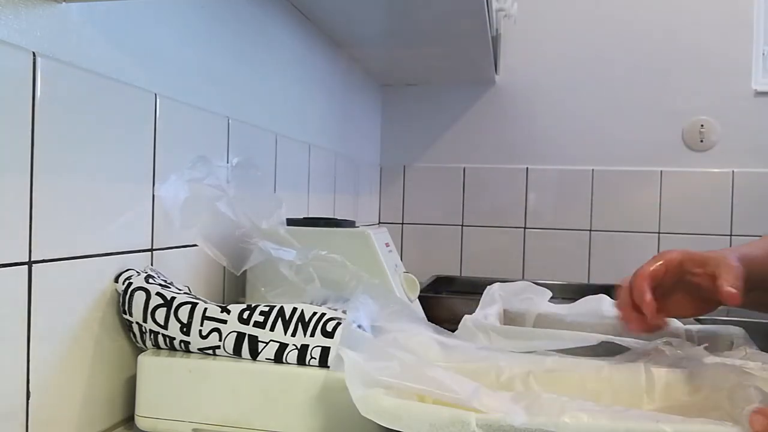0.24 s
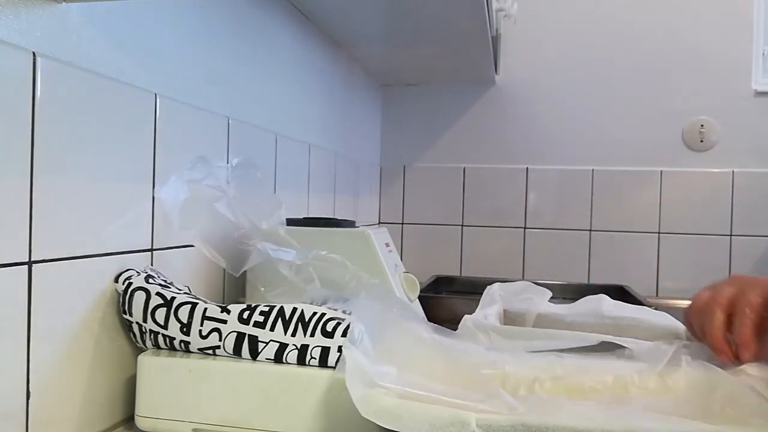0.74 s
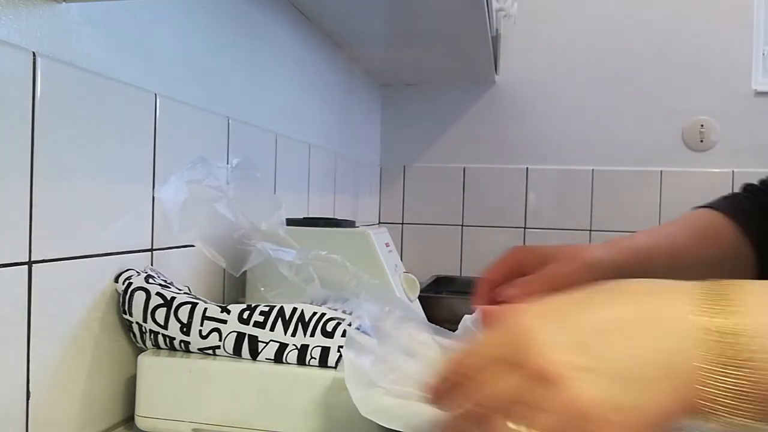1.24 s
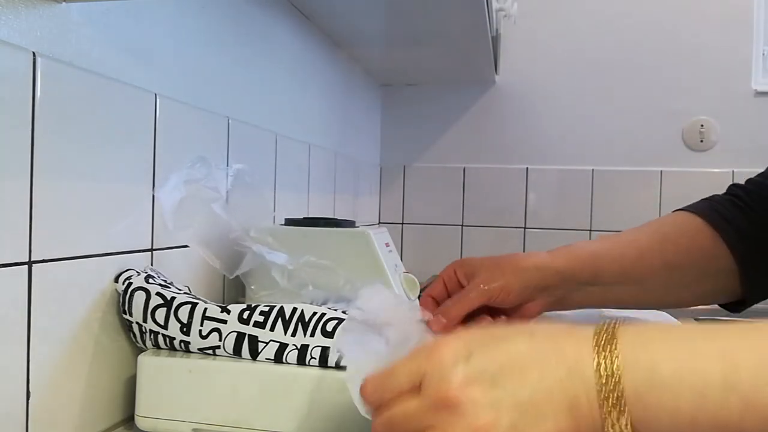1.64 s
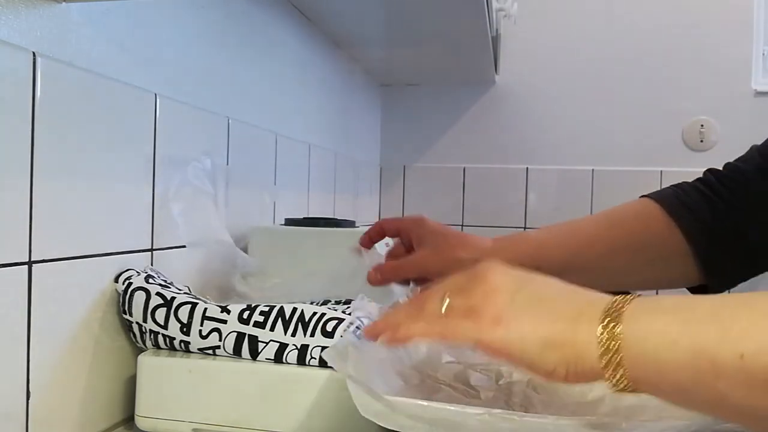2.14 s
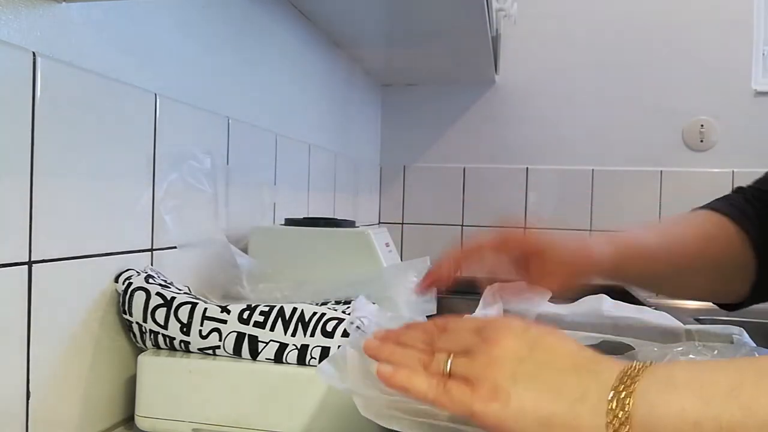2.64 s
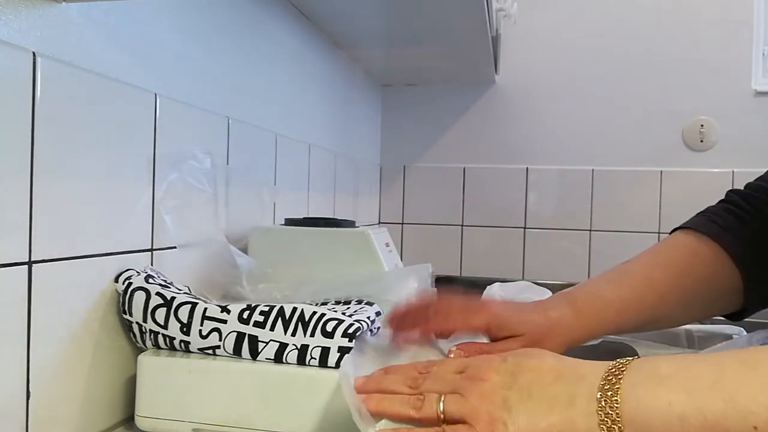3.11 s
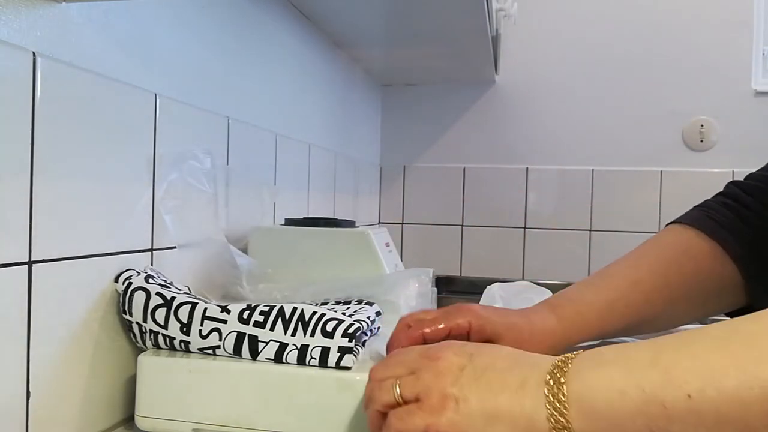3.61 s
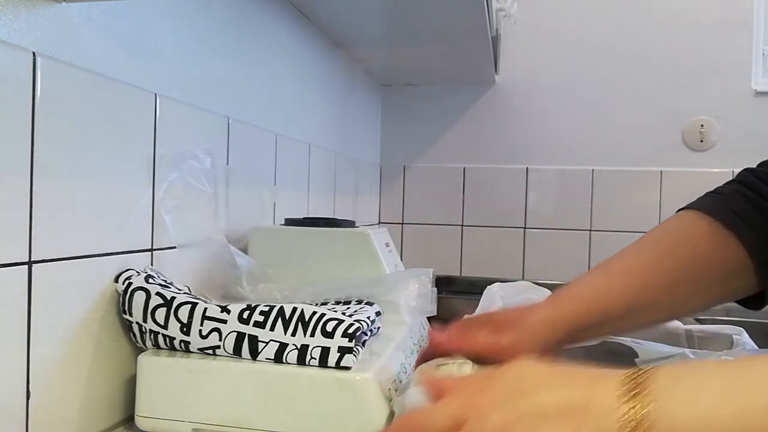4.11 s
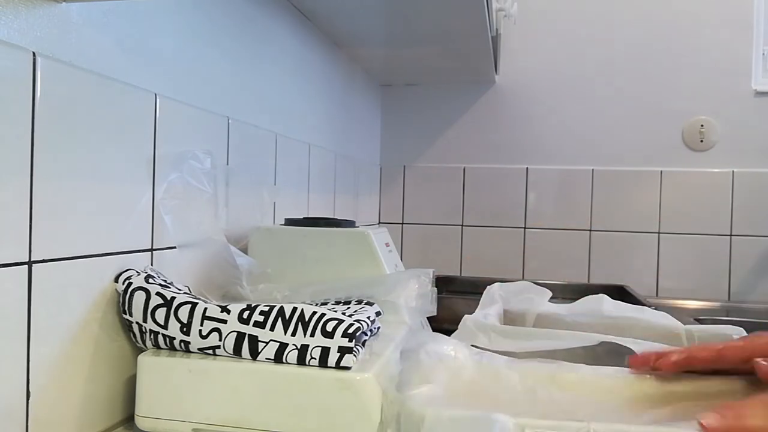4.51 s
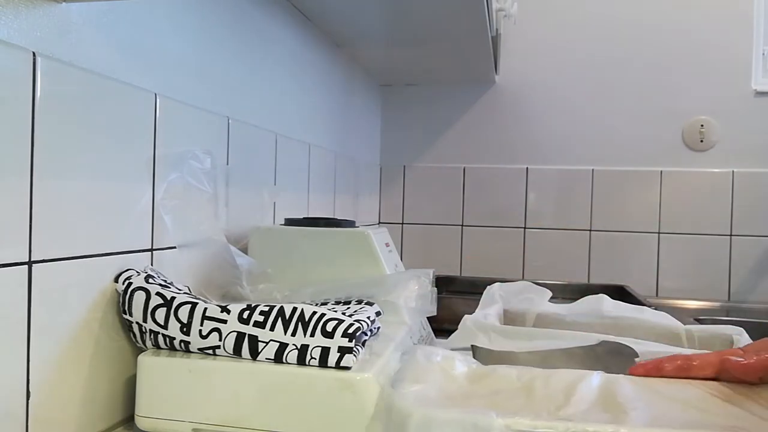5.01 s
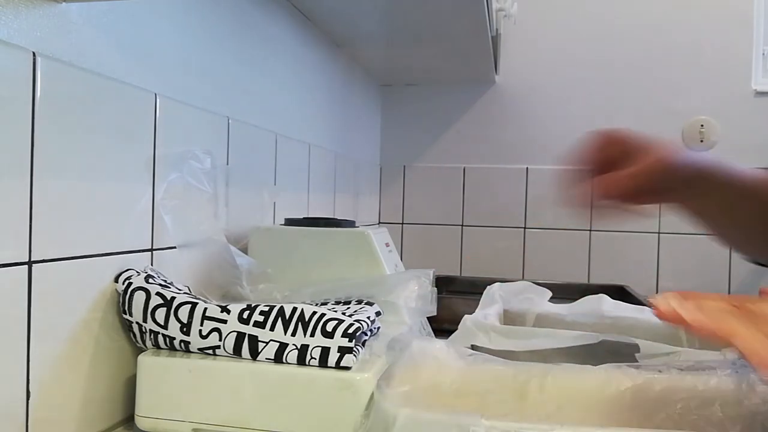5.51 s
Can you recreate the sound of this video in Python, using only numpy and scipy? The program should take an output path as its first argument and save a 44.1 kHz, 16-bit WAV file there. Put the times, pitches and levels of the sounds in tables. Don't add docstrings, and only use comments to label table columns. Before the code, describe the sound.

A thin plastic sheet is folded and tucked over baking tins, close to a stereo microphone in a small, hard tiled kitchen. A tiny crinkle opens the scene, then light rustling from 0.4 s grows to papery snaps and airy pops around 0.75-0.9 s. It nearly stops from 1.0 to 1.3 s, leaving a faint low motor hum and quiet air. A sharp crackle at 1.4 s starts moderate rustling until about 2.25 s, with soft low palm thumps on hollow tin. After a short lull, dense crackling returns at 2.75 s and peaks from 3.4 to 3.85 s in hard, bright snaps and lower fold pops. It continues to 4.2 s, drops, then bursts strongly at 4.45-4.75 s. Smaller clusters follow at 4.9-5.35 s, then quiet, small metallic ticks near 5.55-5.6 s, and a brief final crackle with a soft thump at 5.72 s.

```python
import sys
import numpy as np
from scipy import signal
from scipy.fft import rfft, irfft, next_fast_len
from scipy.io import wavfile
from scipy.ndimage import uniform_filter1d

SR = 44100
rng = np.random.default_rng(int(sys.argv[2]) if len(sys.argv) > 2 else 0)


def amplitude_ratio(level_db):
    exponent = np.asarray(level_db, float) / 20
    return 10 ** exponent


def to_wav(s):
    ch = np.atleast_2d(s).T
    pcm = np.round(np.clip(ch, -1, 1) * 32767)
    wavfile.write(sys.argv[1], SR, pcm.astype(np.int16))


N = 253575


def rms_one(x):
    return x / np.sqrt(np.mean(x ** 2) + 1e-20)


def in_time(rows):
    s, *columns = np.transpose(rows)
    return [np.interp(np.arange(N) / SR, s, column) for column in columns]


def at_hz(points, hz):
    table_hz, value = np.array(points).T
    return np.interp(np.log(np.maximum(hz, 1)), np.log(table_hz), value)


def drift(rate):
    r = np.exp(-80 * np.pi * rate / SR)
    slow = signal.lfilter([1], [1, -2 * r, r * r], rng.standard_normal(N // 40 + 2002))[2000:]
    return np.interp(np.arange(N) / 40, np.arange(len(slow)), rms_one(slow))


def ring(clicks, hz, t60):
    r = amplitude_ratio(-60 / (t60 * SR))
    w = 2 * np.pi * min(hz, .45 * SR) / SR
    return signal.lfilter([np.sin(w)], [1, -2 * r * np.cos(w), r * r], clicks + 1e-18)


def coloured(x, points, share=1):
    size = next_fast_len(x.shape[-1])
    gain = amplitude_ratio(share * at_hz(points, np.fft.rfftfreq(size, 1 / SR)))
    return irfft(rfft(x, size) * gain, size)[..., :x.shape[-1]]


# frequency in Hz, correlation from 0 to 1.
FIELD_LIKENESS = [(30, .985), (100, 0.86), (170, 0.35), (300, 0.071), (600, 0.2), (1200, 0.34),
                  (3000, 0.031)]


def pair(shape):
    mid, side = rfft(rng.standard_normal((2, shape)))
    alike = np.clip(at_hz(FIELD_LIKENESS, np.fft.rfftfreq(shape, 1 / SR)), 0, 1)
    both = np.sqrt(1 + alike) * mid + np.sqrt(1 - alike) * side * [[1], [-1]]
    return irfft(both, shape) / np.sqrt(2)


# frequency in Hz, level in dB per Hz.
AIR_SPECTRUM = [(180, -31), (300, -6.5), (343, -13.5), (450, -16), (994, -16.5), (3700, -21.5), (4370, -26),
                (13300, -37), (16000, -47)]
# frequency in Hz, level in dB per Hz.
RUMBLE_SPECTRUM = [(15, 5), (40, -1), (90, 2.5), (190, -9), (350, -8.5), (600, -38)]


def still_air():
    out = 0
    for spectrum, level_db in ((AIR_SPECTRUM, -75.5), (RUMBLE_SPECTRUM, -76.5)):
        noise = pair(N + N % 2)[:, :N]
        out = out + amplitude_ratio(level_db) * rms_one(coloured(noise, spectrum))
    return out


# time in seconds, level in dB.
DRONE_LEVEL = [(0.0, -79.5), (0.89, -66.5), (1.68, -64), (2.03, -80.5), (2.32, -67.5), (2.37, -77),
               (2.69, -72.5), (2.77, -64), (2.9, -70), (3.27, -76), (3.43, -57.5), (3.73, -85), (3.88, -64),
               (3.96, -84), (4.37, -70), (4.42, -75.5), (5.61, -76), (5.75, -72)]
# frequency in Hz, bandwidth in Hz, level in dB.
ROOM_MODES = [
    (111, 6, -7),
    (137, 14, -3),
    (245, 30, -14),
]


def drone():
    out = 0
    for hz, width_hz, level_db in ROOM_MODES:
        t60 = np.log(1000) / np.pi / width_hz
        out = out + amplitude_ratio(level_db) * rms_one(ring(rng.standard_normal(N), hz, t60))
    near_s, hum_db, hum_hz, wander_hz = 1.3, 14.5, 110.6, 0.13
    near = np.exp(-((np.arange(N) / SR - near_s) / 0.57) ** 4)
    turns = np.cumsum(hum_hz + wander_hz * drift(1.73)) / SR
    out = out + amplitude_ratio(hum_db - 17 * (1.5 - near)) * np.sin(2 * np.pi * turns)
    steady = out / np.sqrt(uniform_filter1d(out ** 2, size=9000))
    return amplitude_ratio(in_time(DRONE_LEVEL)[0]) * steady


# start in seconds, peak in dB, frequency in Hz, t60 in seconds.
PALM_TUCKS = [(1.462, -61, 239, 0.19), (1.789, -58, 243, 0.14), (1.96, -55.5, 274, 0.089),
              (2.011, -61, 290, 0.21), (2.06, -58.5, 245, 0.17), (2.112, -58.5, 286, 0.092),
              (2.2, -58.5, 330, 0.11), (4.529, -54, 243, 0.19), (5.302, -54.5, 310, 0.1),
              (2.776, -56, 122, 0.097), (3.392, -43.5, 247, 0.15), (3.459, -59, 107, 0.1),
              (3.828, -55, 418, 0.12), (5.723, -53.5, 425, 0.17), (2.868, -53, 438, .1),
              (3.226, -54, 452, .1), (3.7, -55, 251, 0.12), (4.05, -55, 440, .1), (5.172, -53, 450, .1),
              (.45, -61, 436, .12), (.83, -60, 252, .14)]


def tucks():
    out = np.zeros(N)
    for s, peak_db, hz, t60 in PALM_TUCKS:
        push, i = np.zeros(N), round(s * SR)
        push[i:i + 60] = np.hanning(60) / 30
        out += amplitude_ratio(peak_db) * ring(push, hz, t60)
    return out


# start in seconds, peak in dB, frequency in Hz, t60 in seconds.
AIR_POCKETS = [(0.757, -46.5, 787, 0.15), (0.799, -43, 712, 0.063), (0.857, -48.5, 1054, 0.048),
               (0.898, -47, 950, 0.05), (1.425, -45, 1090, 0.019), (1.702, -42, 1180, 0.038),
               (1.716, -48, 1280, 0.028), (1.782, -43, 1195, 0.04), (3.141, -39.5, 1330, 0.022),
               (3.166, -33.5, 1237, 0.03), (4.047, -43.5, 994, 0.074), (4.198, -46, 1000, 0.031),
               (4.253, -51.5, 1100, 0.044), (3.113, -39.5, 1164, 0.031), (3.499, -38, 1120, 0.013),
               (3.558, -41, 1150, 0.014), (4.425, -65, 1000, 0.061), (4.454, -39, 3050, 0.067)]


def flaps():
    push_s = 0.0014
    out = np.zeros(N)
    pushes = rng.standard_normal(size=(30, 400)) * np.exp(-np.arange(400) / SR / push_s)
    for (s, peak_db, hz, t60), push in zip(AIR_POCKETS, pushes):
        high = signal.butter(2, hz / 2, "high", fs=SR, output="sos")
        tone = signal.sosfilt(high, ring(np.pad(push, (0, 4000)), hz, t60))
        i = round(s * SR)
        out[i:i + 4400] += amplitude_ratio(peak_db) * tone / np.abs(tone).max()
    return out


# start in seconds, hold in seconds, crinkle in dB, slack in dB.
EARLY_STROKES = [(0.0, 0.0045, -50.5, -1), (0.066, 0.01, -60, 9), (0.164, 0.11, -71, 4),
                 (0.33, 0.056, -66, -8), (0.364, .02, -59.5, -14), (0.405, 0.25, -51, -13.5),
                 (0.62, 0.065, -46.5, -6), (0.723, 0.028, -47.5, -1), (0.758, 0.027, -41, -17.5),
                 (0.769, 0.13, -50, -7), (1.308, 0.007, -74, 5), (1.363, 0.011, -66, 15),
                 (1.391, 0.018, -53, 9), (1.416, 0.019, -44.5, 0), (1.456, 0.059, -47, 1),
                 (1.551, 0.042, -46.5, -9), (1.635, 0.11, -56.5, -14), (1.688, 0.063, -52, -4),
                 (1.768, 0.021, -47, 1), (1.841, 0.16, -52.5, 1), (1.93, 0.32, -51, -11.5),
                 (2.194, 0.028, -45.5, -11), (2.28, 0.1, -59, -3.5), (2.464, 0.088, -70, -4),
                 (2.74, 0.1, -46.5, -4), (2.87, 0.058, -40.5, -1)]
# start in seconds, hold in seconds, crinkle in dB, slack
# in dB.
LATER_STROKES = [(2.91, 0.093, -50, -1), (3.037, 0.043, -45, -1), (3.108, 0.037, -42.5, -7),
                 (3.184, 0.028, -59, 0), (3.217, 0.0041, -53, 13), (3.332, 0.052, -50, 0),
                 (3.385, 0.015, -37, 15), (3.394, 0.051, -35, -12.5), (3.502, 0.3, -39.5, -7.5),
                 (3.761, 0.021, -34.5, -15), (3.838, 0.052, -48, 7), (3.91, 0.12, -43, -22),
                 (4.036, 0.0097, -35.5, -12), (4.078, 0.024, -47, 12), (4.161, 0.0047, -42, -7),
                 (4.197, 0.031, -59, 19), (4.385, .005, -53, -45), (4.426, 0.027, -46.5, -22),
                 (4.462, 0.1, -43, -4), (4.599, 0.11, -41, -17), (4.75, 0.11, -49.5, -29),
                 (4.914, 0.082, -48.5, -15), (5.024, 0.067, -57, -3), (5.109, 0.031, -39, -13),
                 (5.169, 0.0099, -41, 1), (5.197, 0.021, -39.5, -9), (5.256, 0.057, -51, 4),
                 (5.557, 0.015, -58, -27), (5.622, .005, -67, -26), (5.708, .016, -59, -15),
                 (5.723, .04, -40, -33)]


def handling():
    grip_db_per_s, settle_db_per_s, crease_settle_db_per_s = 1496, 267, 129
    t = np.arange(0, N + 32, 32) / SR
    s, hold_s, level_db, slack_db = np.transpose(EARLY_STROKES + LATER_STROKES)[..., None]
    settling_s = np.maximum(t - s - hold_s, 0)
    pull_db = level_db - grip_db_per_s * np.maximum(s - t, 0) - settle_db_per_s * settling_s
    power = amplitude_ratio(pull_db) ** 2 + 1e-14
    crinkle_db, share = 10 * np.log10(power.sum(0)), power / power.sum(0)
    fold_db = (share * slack_db).sum(0)
    settling_s = (share * np.minimum(settling_s, .2)).sum(0)
    crease_db = -15.5 - 0.71 * fold_db - 0.26 * (crinkle_db + 49.5) - crease_settle_db_per_s * settling_s
    return in_time(np.transpose([t, crinkle_db, fold_db, crease_db]))


# frequency in Hz, level in dB per Hz.
SHEET_SPECTRUM = [(180, -50), (300, -33), (511, -16), (565, -51), (645, 0.5), (1040, 9), (2250, 3.5),
                  (3080, 14), (3350, 12.5), (4910, 5.5), (15200, 3), (16000, -34)]
CREASE_ZONES_HZ = [800, 1500, 3200, 10000]


def crinkle(per_s, spread_db, clump_db, cycles, wide):
    crinkle_db, fold_db, crease_db = handling()
    sizes = amplitude_ratio(spread_db * np.minimum(rng.exponential(1, N), 4.0)) * rng.choice([-1, 1], N)
    chance = per_s * amplitude_ratio(clump_db * np.clip(drift(80.0), -1.5, 1.8)) / SR
    snaps = sizes * (rng.random(N) < chance)
    snaps = snaps / np.sqrt(uniform_filter1d(snaps ** 2, size=2600) + .02)
    pitches, dealt = np.geomspace(330, 16000, num=36), rng.integers(0, 36, N)
    whole = rng.random(N) < wide
    fold_share = list(zip(CREASE_ZONES_HZ, [0.5, 0.23, 0.12, 0.34]))
    crease_share = list(zip(CREASE_ZONES_HZ, [0.018, 0.011, 0.0023, 0.47]))
    out = 0
    for k, hz in enumerate(pitches):
        struck = snaps * ((dealt == k) + 0.49 * whole * (-1) ** k)
        patch = rms_one(np.diff(ring(struck, hz, cycles / hz), prepend=0))
        level_db = at_hz(SHEET_SPECTRUM, hz) + at_hz(fold_share, hz) * (fold_db + 12.5)
        level_db = level_db + at_hz(crease_share, hz) * (crease_db + 0.5)
        out = out + amplitude_ratio(level_db) * np.sqrt(hz) * patch
    return amplitude_ratio(crinkle_db - 53) * out


# start in seconds, peak in dB, pitch in Hz.
TIGHT_CREASES = [(.603, -31, 3420), (2.044, -31, 3330), (2.143, -35, 2280), (2.197, -36, 3530),
                 (2.974, -17.5, 3600), (3.51, -21.5, 4900), (3.648, -18.5, 2900), (3.73, -13, 2880),
                 (3.761, -16.5, 3380), (3.776, -12.5, 3270), (4.472, -20, 3200), (4.558, -21.5, 3730),
                 (4.582, -12.5, 4470), (4.597, -19.5, 4870), (4.664, -17, 4180), (4.684, -21, 4720),
                 (4.71, -18, 3200), (4.729, -17, 3160), (4.909, -30, 2860), (5.173, -24, 3000),
                 (5.208, -16.5, 4570), (3.665, -30, 3500), (3.715, -23, 3300), (3.793, -19, 3700),
                 (3.804, -23, 2600), (3.831, -24, 3320), (3.858, -31, 5000), (3.897, -32, 5000),
                 (4.064, -22.5, 5000), (4.612, -28, 4500), (4.694, -26, 4500), (4.751, -27, 6000),
                 (4.574, -21, 8060), (3.142, -23, 3200), (3.396, -27, 5300), (0.049, -46, 5000),
                 (2.91, -22, 3020), (2.93, -31, 2800), (1.783, -23.5, 2570), (4.168, -33, 5930),
                 (.892, -33, 4340), (.781, -22, 4550)]
# start in seconds, peak in dB, pitch in Hz.
FULL_CREASES = [(.392, -42, 2380), (.422, -29, 4350), (.5, -28.5, 3000), (0.629, -37, 3340),
                (0.75, -21.5, 8500), (1.398, -34, 1770), (1.424, -16, 6140), (1.574, -30, 2960),
                (1.959, -25, 2900), (2.209, -24.5, 3390), (2.733, -26, 2870), (2.743, -41, 3030),
                (2.87, -15.5, 3300), (3.079, -24, 5400), (3.226, -22.5, 1680), (3.39, -17, 4430),
                (3.435, -14, 6660), (3.593, -11.5, 3750), (3.701, -11, 3650), (3.819, -14.5, 3680),
                (4.126, -24.5, 4266), (4.453, -28, 3220), (4.524, -15, 2300), (5.201, -15, 6000),
                (5.722, -25.5, 2240)]
# start in seconds, peak in dB, pitch in Hz.
WIDE_FOLDS = [(0.069, -32.5, 1040), (.783, -29, 770), (1.368, -43, 890), (1.7, -29, 1180),
              (1.748, -26.5, 1060), (1.781, -25, 1270), (2.033, -27, 1690), (2.772, -21.5, 1730),
              (2.965, -23.5, 1120), (3.112, -19, 1160), (3.135, -18, 1210), (3.168, -29, 1178),
              (3.227, -19.5, 840), (3.323, -33, 1850), (3.34, -25, 1840), (3.557, -16, 1390),
              (3.743, -18, 2120), (3.921, -21.5, 1572), (3.969, -21.5, 1100), (4.005, -20.5, 998),
              (4.041, -15, 1140), (4.504, -29, 856)]
# start in seconds, peak in dB, pitch in Hz.
CREASE_CRACKS = [(0.16, -59, 3000), (0.36, -48, 2120), (2.405, -44, 2500), (4.274, -34.5, 3600),
                 (5.403, -40.5, 4200), (0.31, -42, 3170), (1.68, -25, 3800), (3.24, -19, 3200),
                 (3.227, -27, 3200), (3.7, -29, 3300), (5.296, -19.5, 4250), (5.335, -22, 3140),
                 (0.72, -30.5, 3900), (1.5, -33, 5000), (2.998, -13, 2800), (3.001, -37, 2940),
                 (3.014, -22.5, 2700), (3.047, -18, 4100), (3.128, -21, 3800), (3.135, -42, 3000),
                 (3.525, -17, 3800), (4.169, -17, 4400), (5, -22, 2400), (4.974, -33, 5000),
                 (4.995, -23, 1800), (5.085, -33, 4900), (5.111, -14.5, 5600), (5.146, -36, 3000),
                 (5.228, -24, 2900), (3.403, -21, 4800), (4.2, -25, 3100), (3.461, -20.5, 4900),
                 (3.537, -21, 5100), (4.1, -15, 8600), (3.581, -17, 3800), (3.76, -24, 2600),
                 (4.415, -40, 4800), (4.011, -32, 4600), (2.862, -31, 7900), (1.387, -39, 3000),
                 (1.317, -62, 6000), (3.21, -33, 3500), (5.717, -44, 6000), (1.771, -26.5, 2200),
                 (2.1, -32, 1900), (2.17, -34, 2400), (5.132, -27, 4000), (4.377, -31, 7300),
                 (5.55, -33, 4300), (5.614, -28.5, 4900), (3.742, -15.5, 8700), (3.167, -34, 3500),
                 (3.654, -27, 13100), (4.14, -17, 13300), (5.9, -18, 13000)]
# start in seconds, peak in dB, centre in Hz.
FOLD_RIPS = [(2.863, -21, 5000), (2.93, -27, 7000), (2.999, -22.5, 6000), (3.052, -25, 4000),
             (3.081, -26, 8000), (3.101, -32, 7000), (3.134, -27, 11000), (3.473, -26, 6960),
             (3.51, -23, 9000), (3.526, -21, 8000), (3.537, -22, 3960), (3.581, -24, 8900),
             (3.666, -27, 9000), (3.689, -31, 7000), (4.167, -27.5, 5500), (4.266, -52, 4500),
             (4.474, -30, 5000), (4.886, -21.5, 3000), (4.91, -28, 2500), (4.941, -30, 2500),
             (4.974, -22, 3000), (4.995, -29, 8000), (5.111, -22, 6000), (5.145, -25, 4000),
             (5.178, -30, 6000), (5.209, -17.5, 5000), (5.228, -25, 4000), (5.297, -28.5, 3530),
             (5.336, -25, 3500), (5.559, -33, 5000), (3.435, -16, 3960), (3.166, -32, 2000),
             (1.422, -26, 5000), (4.047, -24.5, 4000), (3.781, -28, 5000), (3.821, -32, 4450),
             (1.79, -33, 4000), (2.008, -40, 4050), (2.233, -33, 4000)]
# start in seconds, peak in dB, pitch in Hz.
RING_TAPS = [(4.377, -30, 2420), (4.378, -30, 3820), (4.377, -25.5, 5160), (4.376, -40, 7500),
             (5.551, -24.5, 4300), (5.551, -23.5, 5350), (5.551, -30, 9800), (5.553, -38, 765),
             (5.555, -41, 1650), (5.614, -30, 4670), (5.616, -36, 2980), (5.617, -40.5, 1234),
             (5.622, -35, 4500)]
# start in seconds, peak in dB, pitch in Hz.
UNDER_FOLDS = [(2.871, -22, 900), (2.989, -21.5, 1090), (3.226, -22.5, 644), (3.372, -24.5, 1010),
               (3.391, -15, 910), (3.434, -16, 1200), (3.556, -18.5, 1107), (3.602, -23, 1000),
               (3.701, -20, 1000), (3.73, -19.5, 1200), (3.893, -27, 1100), (4.166, -24, 1200),
               (4.612, -25, 1000), (4.973, -27, 1410), (5.143, -23, 1200), (5.176, -28, 700),
               (5.222, -22, 1100), (4.886, -30, 1700), (4.695, -20, 3300), (2.42, -46, 2500),
               (2.36, -43, 1790)]
# dull part in dB, broad crack in dB, volley in ms, swell from 0 to 2,
# ringing in cycles.
CREASE_KINDS = [
    (-33, -12.5, 1.06, 1.6, 7.1),
    (-10, -17, 1.01, 0.87, 7.8),
    (-49, -31, 0.78, 0.78, 9.7),
    (-47, -10, 1.06, 0.12, 6.8),
    (-23, -9, 1.83, .5, 4.3),
    (-50, -20, 0.71, 0.26, 44),
]


def pops(dull_hz):
    spiky = 1.38
    out, ms = np.zeros(N), np.arange(1500) / SR * 1000
    groups = (TIGHT_CREASES, FULL_CREASES, WIDE_FOLDS, CREASE_CRACKS, FOLD_RIPS, RING_TAPS, UNDER_FOLDS)
    kinds = CREASE_KINDS + CREASE_KINDS[2:3]
    creases = [(*row, *kind) for rows, kind in zip(groups, kinds) for row in rows]
    snaps = rng.standard_normal((240, 1500))
    snaps = snaps * np.abs(snaps) ** spiky
    crack = signal.butter(2, [1800, 13000], "band", fs=SR, output="sos")
    for (s, peak_db, hz, dull_db, broad_db, length_ms, swell, cycles), row in zip(creases, snaps):
        length_ms = max(length_ms, .3)
        volley = row * ms ** max(swell, .1) * np.exp(-ms / length_ms)
        tone = np.diff(ring(volley, hz, max(cycles, 1) / hz), prepend=0)
        parts = tone, signal.sosfilt(crack, volley), ring(volley, dull_hz, 0.015)
        tone, broad, dull = (rms_one(part) / np.sqrt(1500 / (44 * length_ms + 30)) for part in parts)
        pop = amplitude_ratio(peak_db - 18) * (tone + amplitude_ratio(broad_db) * broad + amplitude_ratio(dull_db) * dull)
        i = round(s * SR)
        out[i:i + 1500] += pop[:N - i]
    return out


# frequency in Hz, t60 in seconds, level in dB.
TIN_MODES = [
    (243, 0.12, -43.5),
    (457.6, 0.052, -41),
]


def radiated(x):
    thin = signal.sosfilt(signal.butter(6, 620, "high", fs=SR, output="sos"), x)
    hum = sum(amplitude_ratio(level_db) * ring(x, hz, t60) for hz, t60, level_db in TIN_MODES)
    return thin + signal.sosfilt(signal.butter(4, 190, "high", fs=SR, output="sos"), hum)


# start in seconds, level in dB, t60 in seconds, dulled above in Hz.
REFLECTIONS = [
    (.0005, 0, 0.011, 17900),
    (.003, -1.5, 0.11, 13300),
    (.008, -4.5, .3, 7000),
]
# frequency in Hz, left over right in dB.
PORT_LEAN = [(500, 0.5), (1300, -1.3), (2400, -3.5), (4400, 2), (7000, 8.5), (15000, 6.5)]


def kitchen(x, lag_s, stay_s, count):
    t, out, size = np.arange(SR // 2) / SR, 0, next_fast_len(N + SR // 2, True)
    visit = (np.arange(N) / SR / max(stay_s, .004)).astype(int)
    place = rng.integers(0, count, 2000)[visit]
    for k, far in enumerate(rng.uniform(-0.45, 2, count)):
        response = np.zeros((2, len(t)))
        response[[1, 0], [round((1 + far) * lag_s * SR), round(lag_s * SR)]] = 1
        for start, level_db, t60, dull_hz in REFLECTIONS:
            dull = np.exp(-2 * np.pi * dull_hz / SR)
            swarm = signal.lfilter([1], [1, -2 * dull, dull ** 2], pair(len(t)))
            swarm = swarm * (t > start) * amplitude_ratio(-60 * t / t60)
            response += amplitude_ratio(level_db) * swarm / np.sqrt(np.sum(swarm ** 2, axis=1, keepdims=True))
        here = x * uniform_filter1d(1. * (place == k), size=88)
        out = out + rfft(here, size) * rfft(response, size)
    lean_db = at_hz(PORT_LEAN, np.fft.rfftfreq(size, 1 / SR)) * [[.5], [-.5]]
    return irfft(out * amplitude_ratio(lean_db), size)[:, :N]


# time in seconds, left over right in dB.
HAND_PATH = [
    (0, -2),
    (.7, 0),
    (1.7, -0.4),
    (2.3, -1),
    (3.2, -0.5),
    (4.7, -0.5),
    (5.2, -0.5),
    (5.75, 1),
]


def scene():
    sheet = crinkle(per_s=5001, spread_db=1.5, clump_db=4.5, cycles=5.5, wide=0.55) + pops(dull_hz=1040)
    pockets = flaps()
    source = radiated(sheet + amplitude_ratio(-4.5) * pockets)
    hands = amplitude_ratio(in_time(HAND_PATH)[0] * [[.5], [-.5]])
    near = kitchen(source, lag_s=.0002, stay_s=.012, count=12) * hands / 1.144
    return near + pockets + tucks() + drone() + still_air()


def top_cut(x):
    return signal.sosfilt(signal.butter(12, 17040, fs=SR, output="sos"), x)


def record(dry):
    cut = signal.sosfilt(signal.cheby2(14, 50, 16300, fs=SR, output="sos"), dry)
    return top_cut(cut)


dry = scene()
out = record(dry)
to_wav(out)
```